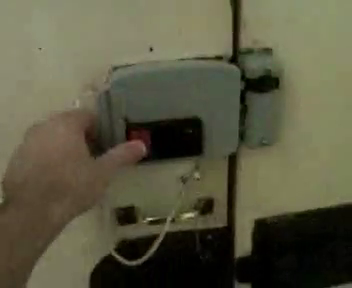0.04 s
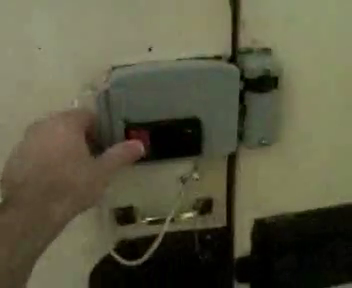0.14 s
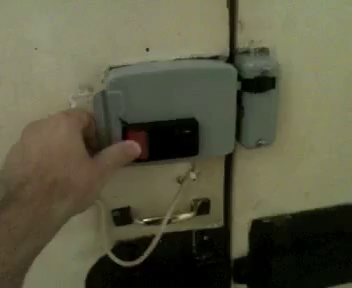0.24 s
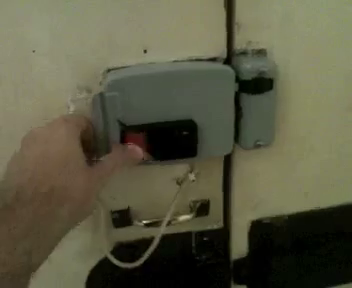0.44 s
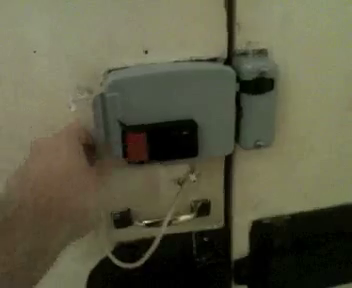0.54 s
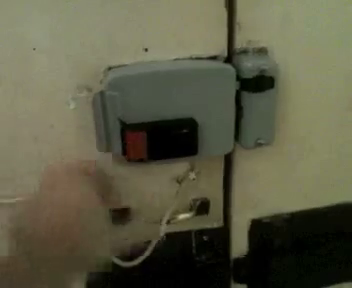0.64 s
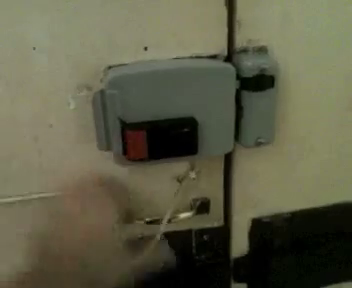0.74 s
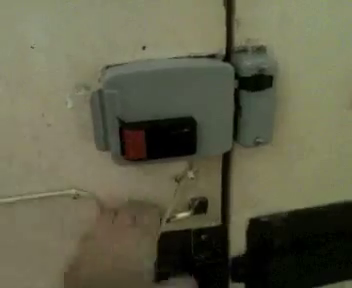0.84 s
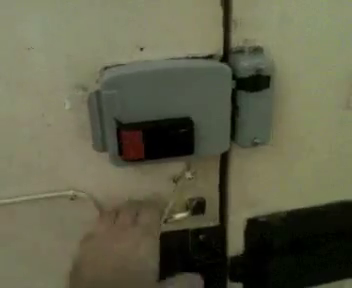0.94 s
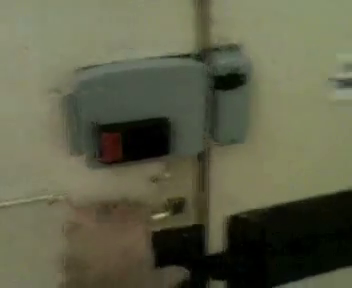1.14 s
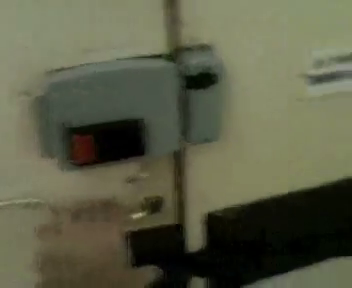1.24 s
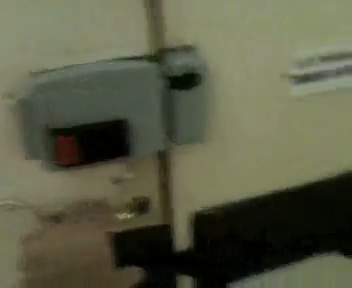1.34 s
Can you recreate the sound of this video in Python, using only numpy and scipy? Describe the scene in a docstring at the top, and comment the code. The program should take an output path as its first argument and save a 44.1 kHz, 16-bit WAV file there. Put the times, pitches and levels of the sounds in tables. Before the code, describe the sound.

An electric door lock clacks open, heard close in a bare stairwell. Soft dull thumb taps on a plastic button come at 0.06 to 0.17 s. From 0.2 to 0.28 s the bolt clatters in rapid bright metal blows with a woody door thump. The echo decays over a quiet hush; a thin tick at 0.54 s, then faint hiss and hinge squeak from 1.2 s, with a small handle tick at 1.39 s.

```python
"""Soft thumb taps on a button, then an electric door lock's bolt clatters back in a bare stairwell.
Bursts of random clicks ring the metal lock case and make the door boom; fading noise gives the echo.
The button springs back with a thin tick, then the door opens: wavering tones and hiss make the
hinge squeak, and the handle ticks once. A steady hush of shaped noise lies underneath."""
import sys
import numpy as np
from scipy import signal
from scipy.fft import rfft, irfft, next_fast_len
from scipy.io import wavfile

SR = 44100
rng = np.random.default_rng(int(sys.argv[2]) if len(sys.argv) > 2 else 0)


def to_wav(s):
    """Save 16-bit WAV."""
    ch = np.atleast_2d(s).T  # columns
    pcm = np.round(np.clip(ch, -1, 1) * 32767)  # PCM
    wavfile.write(sys.argv[1], SR, pcm.astype(np.int16))


N = 61739  # length of the scene [samples]


def from_db(db):
    """Turn decibels into an amplitude factor."""
    return 10 ** (np.asarray(db) / 20)


def rms_one(x):
    """Scale a signal to an rms level of 1."""
    return x / np.sqrt(np.mean(x ** 2) + 1e-20)


def in_time(rows):
    """Join the points of a table, time first, into one curve per remaining column."""
    times, *columns = np.transpose(rows)
    return [np.interp(np.arange(N) / SR, times, column) for column in columns]


def filtered(x, hz, kind):
    """Keep the part of a sound above, below or between the given frequencies."""
    return signal.sosfilt(signal.butter(2, hz, kind, fs=SR, output="sos"), x)


def drift(rate_hz):
    """Random wandering with spread 1, no faster than about rate_hz."""
    return rms_one(filtered(rng.standard_normal(N), rate_hz, "low"))


def body(force, modes):
    """A push sets each mode of an object ringing: a sine that dies by 60 dB in its own time."""
    ringing = 0
    for k, (hz, db, t60) in enumerate(modes):
        radius = from_db(-60 / (t60 * SR))  # loss per sample
        angle = 2 * np.pi * hz / SR
        top = [0, from_db(db) * np.sin(angle)]
        bottom = [1, -2 * radius * np.cos(angle), radius * radius]
        sign = (-1) ** k  # neighbouring modes start in opposite directions
        ringing = ringing + sign * signal.lfilter(top, bottom, force + 1e-18)
    return ringing


def air():
    """Steady hush of the building and microphone: noise shaped by a loudness curve over frequency."""
    # colour of the hush: (frequency [Hz], relative level [dB])
    hush = [(24, -52), (40, -26), (112, -18.5), (226, -7), (491, -5.5), (1520, -13), (4240, -23),
            (4570, -23.5), (6020, -22), (16000, -24.5)]
    level_db = -62.5
    points, db = np.transpose(hush)
    hz = np.maximum(np.arange(N // 2 + 1) * SR / N, 1)
    colour = from_db(np.interp(np.log(hz), np.log(points), db))
    noise = irfft(rfft(rng.standard_normal(N)) * colour, N)
    return from_db(level_db) * rms_one(noise)


def stairwell(x):
    """Echo of the bare walls: noise that builds up quickly, then dies at its own pace in each band."""
    # how the stairwell echoes: (frequency [Hz], level [dB], time to fall 60 dB in the slow part [s])
    echo_bands = np.array([(100, -26.5, 1.5), (210.3, -22.5, 3.5), (300, -17.5, 2.8), (450, -8.5, 2.16),
                           (660, -0.5, 2.03), (1200, -3.5, 1.73), (2000, -6.5, 1.68), (3200, -13, 1.41),
                           (4890, -20, 1.23), (7500, -11, 0.9), (10000, -18, 0.66), (12500, -17, 0.53),
                           (14570, -19.5, .3), (16100, -21, 0.17)])
    build_up_s, early_db, early_t60_s = 0.008, 0.5, 0.38
    t = np.arange(N) / SR
    white = rng.standard_normal((2, N))
    edges = 70 * 2 ** np.arange(0, 8.1, 1 / 3)  # bands a third of an octave wide [Hz]
    early = from_db(early_db - 60 * t / early_t60_s)
    echo = 0
    for k, (low, high) in enumerate(zip(edges, edges[1:])):
        middle = np.log(low * high) / 2
        db, t60 = [np.interp(middle, np.log(echo_bands[:, 0]), echo_bands[:, c]) for c in (1, 2)]
        band = filtered(white[k % 2], [low, high], "band")  # neighbours use different noise
        echo = echo + band * from_db(db) * (from_db(-60 * t / t60) + early)
    echo = echo * (1 - np.exp(-t / build_up_s))
    # every moment of x starts its own copy of the echo
    size = next_fast_len(2 * N)
    return irfft(rfft(x, size) * rfft(echo, size), size)[:N]


def handle():
    """One small tick as the door is pulled: a single push rings the handle."""
    # modes of the handle: (frequency [Hz], level [dB], time to fall 60 dB [s])
    handle_modes = [(1350, -0.5, .012), (2090, 0, 0.01), (3620, -9, .012), (5500, -8, .006),
                    (6700, -6, .006)]
    tick_s, tick_db = 1.3905, -44
    force = np.zeros(N)
    force[int(tick_s * SR)] = from_db(tick_db)
    return body(force, handle_modes)


def spring():
    """A thin tick as the button springs back: a single push rings a few high modes."""
    # modes of the spring: (frequency [Hz], level [dB], time to fall 60 dB [s])
    spring_modes = [(7312, -7, 0.0043), (8600, -4, 0.0049), (9570, 5, 0.0082)]
    release_s, release_db = 0.5432, -32.5
    force = np.zeros(N)
    force[int(release_s * SR)] = from_db(release_db)
    return body(force, spring_modes)


def squeak_tone(hz, db):
    """A sine whose pitch wobbles and whose level flutters at random around the given curves."""
    wobble, flutter_db = 0.005, 2.5  # typical spread: share of the pitch, level [dB]
    level = from_db(db + flutter_db * drift(200))
    wavering_hz = hz * (1 + wobble * drift(420))
    return np.sqrt(2) * level * np.sin(2 * np.pi * np.cumsum(wavering_hz) / SR)


def hinge():
    """The turning hinge: a squeak with overtones, lone whistles, and a faint hiss of rubbing."""
    # squeak: (time [s], frequency of the first listed overtone times 1.5 [Hz], level [dB])
    # that frequency is three times the base pitch; each overtone adds its own level
    squeak = [(1.25, 7800, -92), (1.29, 8350, -84.5), (1.31, 8780, -71.5), (1.33, 9010, -70),
              (1.35, 9160, -66), (1.40, 9550, -77)]
    # overtones of the squeak: (multiple of the base pitch, level added [dB])
    overtones = [(2, -12), (3, -3), (4, 1), (5, -2)]
    # lone whistles, one list each: (time [s], frequency [Hz], level [dB])
    whistles = [
        [(1.255, 7760, -82), (1.27, 8140, -69), (1.29, 8580, -66), (1.31, 9140, -66), (1.335, 9470, -65.5),
         (1.355, 9500, -68), (1.372, 9200, -69), (1.4, 9320, -60)],
        [(1.30, 9800, -83), (1.33, 10080, -69), (1.35, 10050, -76), (1.36, 10600, -73), (1.40, 10620, -54.5)],
    ]
    # hiss of the turning door: (time [s], level [dB])
    rub_levels = [(1.15, -76), (1.22, -67), (1.3, -63.5), (1.4, -61.5)]
    t = np.arange(N) / SR

    hz, db = in_time(squeak)
    base_hz = hz / overtones[1][0]  # the table follows the second overtone listed
    squeal = sum(squeak_tone(base_hz * multiple, db + level) for multiple, level in overtones)
    squeal = squeal * (t > squeak[0][0])

    whistling = sum(squeak_tone(*in_time(rows)) * (t > rows[0][0]) for rows in whistles)

    rub = rms_one(filtered(rng.standard_normal(N), [1500, 7000], "band"))
    hiss = from_db(in_time(rub_levels)[0]) * rub * (t > rub_levels[0][0])
    return squeal + whistling + hiss


def button():
    """Soft thumb touches ring the hollow plastic; its lowest mode swells instead of starting at once."""
    # touches of the thumb: (time [s], level [dB])
    taps = [(0.0630, -53.5), (0.0910, -66.5), (0.1670, -44.5)]
    # modes of the plastic button: (frequency [Hz], level [dB], time to fall 60 dB [s])
    button_modes = [(677, 1.5, 0.018), (1330, -6, .02), (2456, -1, .015), (3150, -0.5, 0.023),
                    (3700, -2, .015)]
    soft_hz = 910  # the push is dulled above this
    force = np.zeros(N)
    for s, db in taps:
        force[int(s * SR)] = from_db(db)
    keep = np.exp(-2 * np.pi * soft_hz / SR)
    push = signal.lfilter([1 - keep], [1, -keep], force)
    # a dull 596 Hz resonance rings first and drives the button's lowest mode, so it swells
    swell = body(push, [(596, -22, 0.024)])
    return body(swell, button_modes[:1]) + body(push, button_modes[1:])


def bolt():
    """Bolt blows are short bursts of clicks ringing case and door; bare knocks are also returned."""
    # blows: (time [s], level in the lock case [dB], level in the door [dB], decay time constant [ms])
    blows = [(0.2012, -42.5, -27.5, 12), (0.2107, -28.5, -40.5, 0.2), (0.2160, -23.5, -29.5, 0.86),
             (0.2178, -10, -29, 1.75), (0.2221, -22.5, -16.5, 1.227), (0.227, -14.5, -34.5, 1.2),
             (0.2342, -20.5, -22.5, 1.56), (0.2565, -13, -22, 1.5), (0.2593, -12.5, -15, 1.8),
             (0.2623, -20.5, -24.5, 1.0), (0.2720, -14, -21.5, 1)]
    # modes of the lock case: (frequency [Hz], level [dB], time to fall 60 dB [s])
    case_modes = [(5870, -5, .008), (6100, -4, 0.011), (7090, 1.5, 0.0091), (7350, 0, .012),
                  (8060, 7.5, 0.0042), (8800, 3, 0.0035), (9050, 6.5, 0.004), (10140, 0, .006),
                  (11200, -2.5, 0.0074), (12260, 3.5, 0.0044), (12570, 1, .006), (13700, -13.5, 0.0035),
                  (14160, 3, .007), (15500, 0, .006)]
    # modes of the door leaf: (frequency [Hz], level [dB], time to fall 60 dB [s])
    door_modes = [(75.4, -29.5, 0.14), (258.6, -23, .06), (421.2, -13, 0.046), (484, -8.5, 0.022),
                  (667, -2, 0.028), (760, -7, 0.07), (922, -1.5, .04), (1112, -4, 0.064),
                  (1308, -6.5, 0.017), (1726, -2.5, 0.014), (2010, -7, 0.049), (2606, 3.5, 0.014),
                  (3350, -4.5, 0.0047), (3890, -3.5, 0.011)]
    clicks_per_s, click_spread_db = 11000, 3.0
    rise_share = 0.63  # rise time constant as a share of the decay time constant
    crossover_hz = 4500
    crack_db = 3.5  # bare crack of the clicks beside the ringing

    t = np.arange(N) / SR
    clicks = (rng.random(N) < clicks_per_s / SR) * 1.0
    clicks = clicks * from_db(click_spread_db * rng.standard_normal(N))
    clicks = clicks * rng.choice([-1, 1], N)

    on_case, on_door, knocks = np.zeros(N), np.zeros(N), np.zeros((2, N))
    for s, case_db, door_db, ms in blows:
        age = np.maximum(t - s, 0) * 1000 / ms  # counted in decay time constants
        burst = (1 - np.exp(-age / rise_share)) * np.exp(-age) * clicks
        burst = burst / np.sqrt(np.sum(burst ** 2) + 1e-20)  # equal energy before the levels
        on_case += from_db(case_db) * burst
        on_door += from_db(door_db) * burst
        # a single knock at the strongest click feeds the echo
        knocks[:, np.argmax(np.abs(burst))] += from_db([case_db, door_db])

    case_knocks = filtered(knocks[0] + 1e-18, crossover_hz, "high")
    door_knocks = filtered(knocks[1] + 1e-18, crossover_hz, "low")
    crack = from_db(crack_db) * filtered(on_case + 1e-18, crossover_hz, "high")
    clack = crack + body(on_case, case_modes) + body(on_door, door_modes)
    return clack, door_knocks - case_knocks


def scene():
    """All the sources with their echo, the same in both channels as from one microphone."""
    quiet_echo_db = -40.5  # how much of the quiet sounds reaches the echo
    clack, knocks = bolt()
    quiet = button() + spring() + hinge() + handle()
    echo = stairwell(knocks + from_db(quiet_echo_db) * quiet)
    mono = clack + quiet + echo + air()
    return np.array([mono, mono])


def record(dry):
    """The microphone lacks bass below about 160 Hz; a steep filter removes the top from 16200 Hz."""
    thin = filtered(dry, 160, "high")
    return signal.sosfilt(signal.cheby2(24, 80, 16200, fs=SR, output="sos"), thin)


dry = scene()
out = record(dry)
to_wav(out)
```